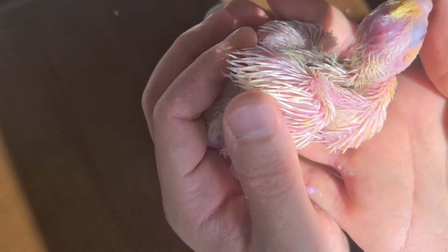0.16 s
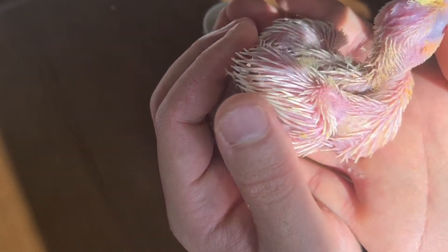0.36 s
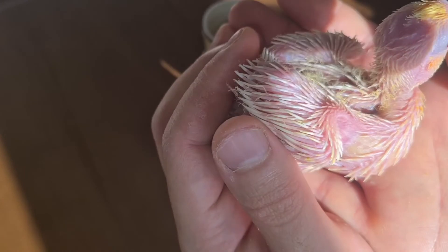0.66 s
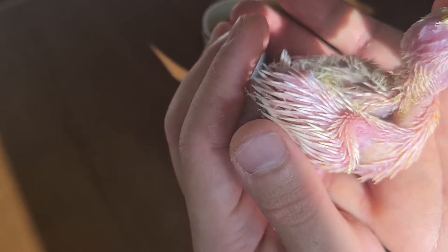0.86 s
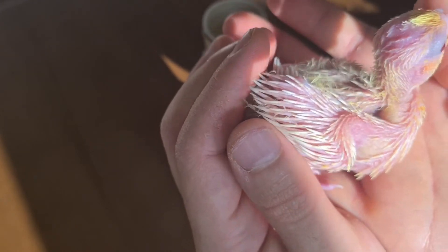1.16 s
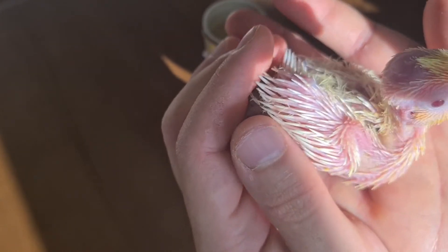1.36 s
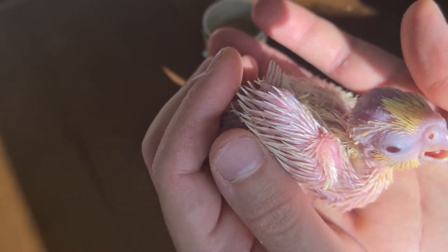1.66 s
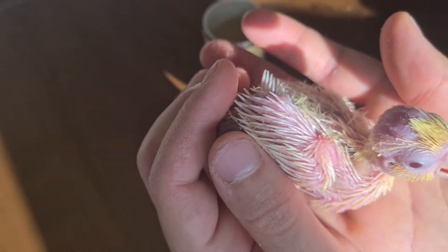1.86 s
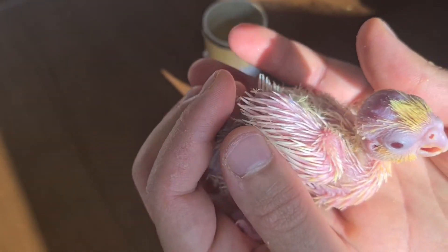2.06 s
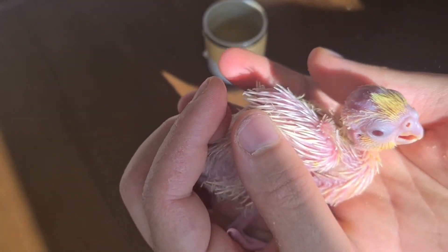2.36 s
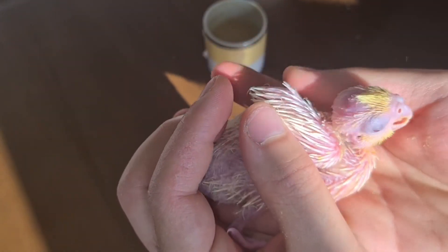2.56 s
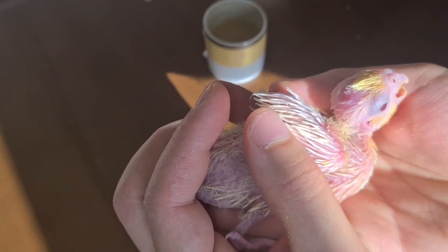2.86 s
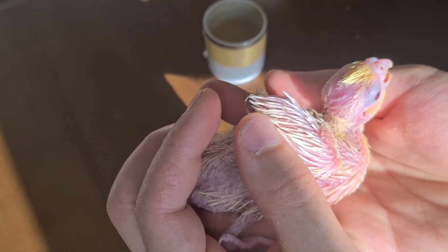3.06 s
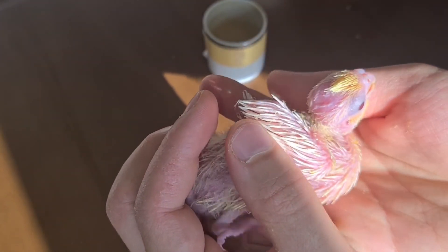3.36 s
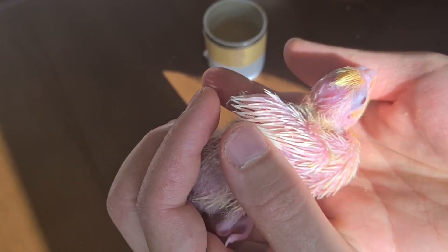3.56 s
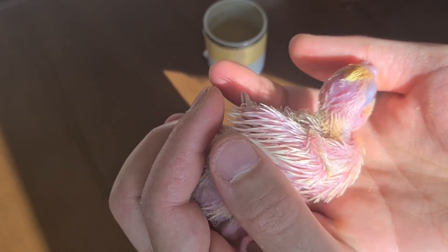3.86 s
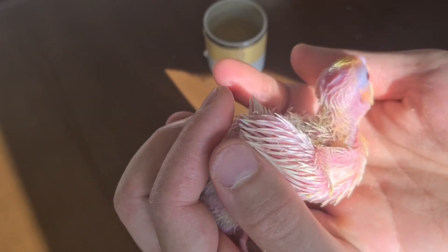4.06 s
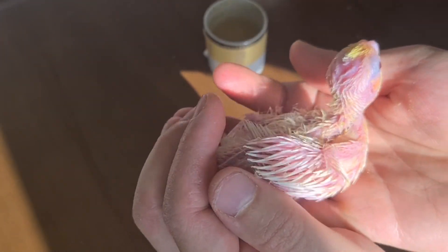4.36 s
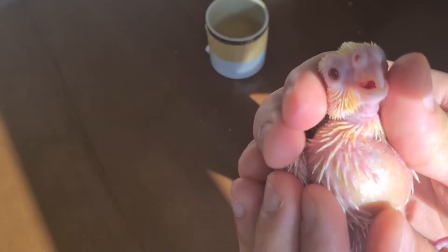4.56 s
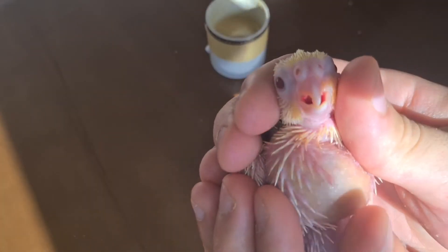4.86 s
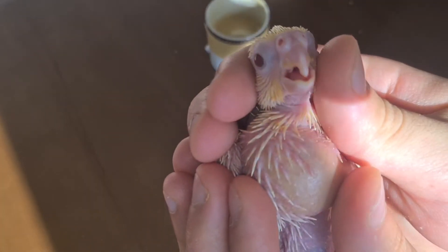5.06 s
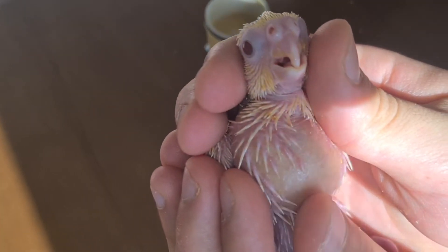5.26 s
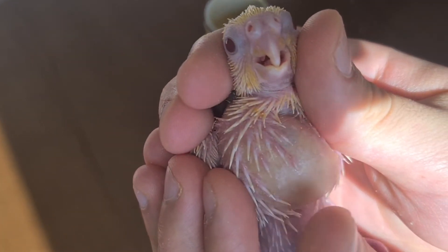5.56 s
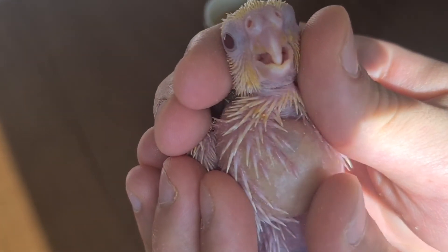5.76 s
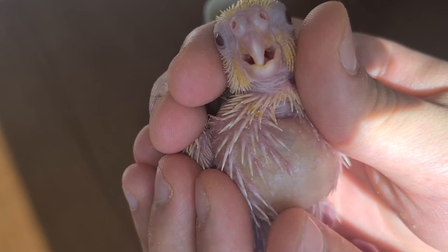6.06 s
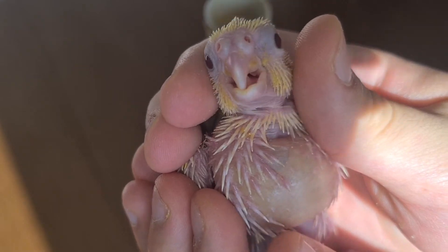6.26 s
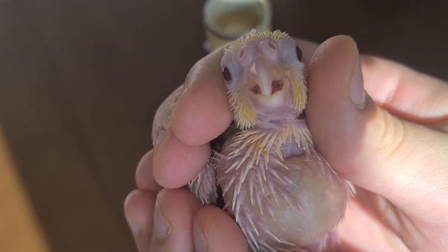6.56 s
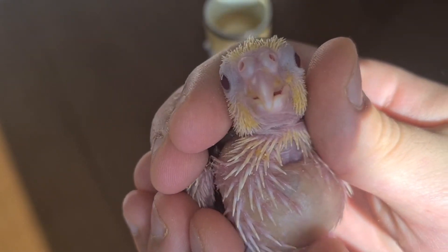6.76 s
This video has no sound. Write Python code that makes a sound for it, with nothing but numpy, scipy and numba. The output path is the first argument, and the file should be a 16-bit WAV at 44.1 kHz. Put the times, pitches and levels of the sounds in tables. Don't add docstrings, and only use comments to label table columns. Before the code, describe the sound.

A small parrot chick begs close by in a quiet room, giving nine harsh, rasping, hissy whistle-squeals with short gaps between them.

```python
import sys
import numpy as np
from scipy import signal
from scipy.fft import rfft, irfft, next_fast_len
from scipy.io import wavfile
from scipy.ndimage import uniform_filter1d, map_coordinates
from numba import njit

SR = 44100
rng = np.random.default_rng(int(sys.argv[2]) if len(sys.argv) > 2 else 0)


def to_linear_factor(level_db):
    exponent = np.asarray(level_db, float) / 20
    return 10 ** exponent


def dump_mix(stems):
    frames = np.atleast_2d(stems).T
    limited = np.clip(frames, -1, 1)
    pcm = np.round(limited * 32767).astype(np.int16)
    wavfile.write(sys.argv[1], SR, pcm)


N = 305172
PALATE_HZ = 6050

# start_s, left_right_db, palm_echo_ms, beak_to_mic_db
HEAD_TURNS = [(0, -2, .8, 5), (.8, -2, .75, 2), (1.25, -3.5, .8, -3), (1.9, -3, 1, 0.5),
              (2.4, -2.5, 0.77, 1), (2.8, -2, 0.8, -7.5), (3.3, 0.5, 0.664, 7), (3.8, -2, .75, 4.5),
              (4.2, -1.5, .8, 2), (4.66, -1.5, .8, 0), (4.88, 5.5, 0.76, -2), (5.3, 3, .65, -0.5),
              (5.8, 3, .6, 3.5), (6.2, 3, 0.53, -3), (6.9, 4.5, .6, 4)]


def rms_one(x):
    return x / np.sqrt(np.mean(x ** 2) + 1e-20)


def at_hz(points, hz):
    point_hz, value = np.array(points).T
    return np.interp(np.log(hz + 1), np.log(point_hz + 1), value)


def in_time(rows):
    s, *columns = np.transpose(rows)
    return [np.interp(np.arange(N) / SR, s, c) for c in columns]


def smooth(x, hz):
    r = np.exp(-2 * np.pi * hz / SR)
    return signal.lfilter([(1 - r) ** 2], [1, -2 * r, r * r], x)


def drift(hz):
    return rms_one(smooth(rng.standard_normal(N), hz))


def colour(x, gain):
    size = next_fast_len(N + 4096)
    hz = np.arange(size // 2 + 1) * SR / size
    return irfft(rfft(x, size) * gain(hz), size)[..., :N]


@njit
def resonate(x, hz, width):
    out = np.zeros(len(x))
    r = np.exp(-np.pi * width / SR) * np.ones(len(x))
    turn = 2 * np.cos(2 * np.pi * hz / SR) * r
    for i in range(2, len(x)):
        out[i] = (1 - r[i]) * (x[i] - x[i - 2]) + turn[i] * out[i - 1] - r[i] ** 2 * out[i - 2]
    return out


def ring(x, hz, width_hz):
    return resonate(x, np.full(len(x), float(hz)), float(width_hz))


def even(x):
    return x / np.sqrt(uniform_filter1d(x ** 2, size=2646) + 1e-12)


def calls():
    c = controls()
    b = breaks(c)
    drive_air = rng.standard_normal(N)
    drive = 0.4 * b["clicks"] + drive_air * b["puffs"]
    whistle, octave = voice_box(c, b)
    voice = to_linear_factor(-1.5) * whistle + to_linear_factor(c["hiss_db"] - 11.5) * octave
    voice = voice + to_linear_factor(c["rasp_db"] + 0.5) * throat(c, b)
    voice = voice + to_linear_factor(c["mouth_db"]) * mouth(c, drive)
    voice = voice + to_linear_factor(c["hiss_db"] + c["palate_db"]) * palate(drive)
    effort = smooth(c["on"], 440) * to_linear_factor(c["whistle_db"])
    return effort * (voice + beak_hiss(c, b, drive_air))


def controls():
    # start_s, whistle_db, whistle_hz, rasp_db (air spilling past the whistle)
    first_calls = [
        [(0, -40, 3738, 0), (.1, -37.5, 3929, 1), (.21, -34, 3790, -2), (.28, -40, 3659, 1),
         (.41, -37, 4020, -2), (.432, -38, 3916, -3), (.443, -44, 3780, 0)],
        [(.677, -56, 3050, 2), (.714, -61, 3090, 4), (.738, -44.5, 3500, 1), (.931, -37.5, 3813, 3),
         (1.047, -38.5, 3884, 2), (1.125, -37, 3945, -1), (1.225, -36.5, 4347, 3.5), (1.259, -27.5, 4320, -12),
         (1.268, -43.5, 4405, 6)],
        [(1.68, -34.5, 3590, -16), (1.704, -32, 3630, -14), (1.712, -37.5, 3657, -4), (1.85, -35.5, 3815, -1),
         (1.97, -37.5, 4206, 3), (2.194, -29.5, 4464, -3), (2.466, -30, 4676, -2.5), (2.486, -27, 4840, -4),
         (2.505, -37.5, 4930, 3)],
    ]
    middle_calls = [
        [(2.772, -28.5, 3955, -12), (2.79, -38, 4253, 0), (2.86, -37.5, 4494, -1), (2.92, -35, 4234, -2),
         (2.99, -33, 4553, -4), (3.011, -28, 4650, -18), (3.02, -32.5, 4705, -3), (3.24, -29.5, 4778, -6),
         (3.372, -26, 5302, -14)],
        [(3.695, -31, 3658, -11), (3.707, -38, 3640, 3), (3.749, -35, 3620, 3), (3.837, -33, 3563, -6),
         (3.907, -36, 3812, 3), (4.021, -34.5, 3937, -3), (4.19, -35.5, 4324, 0), (4.263, -33.5, 4286, -2),
         (4.272, -46, 4250, 8)],
        [(4.459, -57, 3097, 2), (4.475, -54, 3510, 6), (4.514, -45, 3708, 5), (4.554, -42, 3904, 5),
         (4.654, -37.5, 4277, 3), (4.669, -46, 4350, 8)],
    ]
    late_calls = [
        [(4.882, -37.5, 3164, -18), (4.96, -37.5, 3420, -10), (5.03, -40.5, 4192, -7),
         (5.098, -44.5, 4056, -21), (5.12, -42, 4210, -4), (5.2, -41, 3880, -2), (5.3, -37.5, 4400, 2),
         (5.394, -30, 5100, -11), (5.42, -32.5, 5155, -10)],
        [(5.67, -43.5, 3046, -3), (5.715, -37.5, 3563, -3), (5.78, -38.5, 3753, -6), (5.974, -39, 3780, -7),
         (6.032, -41.5, 3798, -18), (6.096, -31, 4100, -4.5), (6.122, -31.5, 4526, -20),
         (6.165, -34.5, 4023, -18), (6.222, -27.5, 4856, -10)],
        [(6.555, -51, 3540, 0), (6.561, -43, 3590, -7), (6.579, -38, 3697, -4.5), (6.695, -40.5, 3680, -12),
         (6.765, -46.5, 3653, -5), (6.795, -37.5, 3710, -21), (6.845, -38.5, 3790, -10.5),
         (6.92, -38, 3940, -12)],
    ]
    # throat_hz, throat_width_hz, breathiness (0-1)
    throats = [(1786, 320, .52), (1720, 316, .5), (1620, 306, .6), (1625, 412, .62), (1876, 790, .6),
               (1620, 490, .7), (1910, 997, .33), (1808.5, 900, .31), (1750, 855, .28)]
    # mouth_db, lowest_ring_db, gape_db, palate_db, hiss_db
    beaks = [(-4, -1, 0, -5, -7), (-6.5, 2, -5, -11.5, -11.5), (-8.5, 6.5, 3.5, -8.5, -9.5),
             (-5, -1.5, 2.5, -4, -7.5), (-2, -4, -15.5, -22, -7.5), (-5, -2.5, -13, -19, -10.5),
             (-3, 5.5, -11.5, -16, -10.5), (-0.5, 7, -8.5, -12, -12.5), (0.5, 6.5, -28, -1.5, -13)]
    clear_s = 0.07
    clear_breaks_per_s, breathy_breaks_per_s = 120, 520
    hiss_late_db, hiss_rise_s = -11.5, 0.04
    hiss_last_db, hiss_last_s = 7, 0.02

    curves = first_calls + middle_calls + late_calls
    whistle_db, whistle_hz, rasp_db = in_time(np.concatenate(curves))
    t = np.arange(N) / SR
    starts = np.array([curve[0][0] for curve in curves])
    ends = np.array([curve[-1][0] for curve in curves])
    call = np.maximum(np.searchsorted(starts, t, "right") - 1, 0)
    throat_hz, throat_width_hz, breathy = np.transpose(throats)[:, call]
    mouth_db, boom_db, gape_db, palate_db, hiss_db = np.transpose(beaks)[:, call]
    climb_hz = whistle_hz - 4000
    climb_khz = climb_hz / 1000

    warmed = np.where(call > 0, 1 - np.exp((starts[call] - t) / clear_s), 1)
    share = np.clip(warmed * (breathy + 0.14 * climb_khz + 0.013 * rasp_db), 0, 0.95)
    onset_db = (call > 0) * hiss_late_db * np.exp((starts[call] - t) / hiss_rise_s)
    spurt_db = (call < call.max()) * hiss_last_db * np.exp(-abs(ends[call] - t) / hiss_last_s)
    return dict(
        on=t < ends[call],
        whistle_db=whistle_db, whistle_hz=whistle_hz, rasp_db=rasp_db,
        throat_hz=throat_hz + 0.23 * climb_hz,
        throat_width_hz=throat_width_hz,
        share=share,
        breaks_per_s=clear_breaks_per_s + share * (breathy_breaks_per_s - clear_breaks_per_s),
        mouth_db=mouth_db + 1.1 * rasp_db,
        boom_db=boom_db - 6.5 * climb_khz,
        palate_db=palate_db + 7 * climb_khz,
        spread=1 + np.maximum(climb_khz - 0.45, 0),
        gape_db=gape_db + 2.5 * climb_khz + 0.4 * rasp_db,
        hiss_db=hiss_db + 0.74 * rasp_db + onset_db + spurt_db)


def breaks(c):
    turn = np.cumsum(c["breaks_per_s"] * to_linear_factor(5.5 * drift(90)) / SR)
    count, grown = turn.astype(int), turn % 1
    size, detune, restart = rng.standard_normal((6000, 3))[count % 6000].T
    swell = smooth(to_linear_factor(2 * size) * (0.15 + np.tanh(1.2 * grown)) * (grown < 0.9), 900)
    burst = smooth(to_linear_factor(2.5 * size) * 1.3 * np.exp(-6 * grown), 2000)
    puffs = (0.9 * c["share"] + 0.25 * swell + burst) * to_linear_factor(drift(30))
    clicks = rms_one(np.diff(count, prepend=0) * to_linear_factor(size))
    return dict(grown=grown, detune=detune, restart=restart, swell=swell, puffs=puffs, clicks=clicks)


def voice_box(c, b):
    whistle_hz, share, spread = c["whistle_hz"], c["share"], c["spread"]
    unsteady = 0.3 + share
    wander = 0.03 * smooth(b["detune"], 500) + 0.012 * drift(200)
    sag = 0.025 * smooth(b["grown"] ** 6, 700)
    pitch_hz = whistle_hz * (1 + unsteady * wander - sag)
    phase = 2 * np.pi * np.cumsum(pitch_hz) / SR + 1.1 * smooth(b["restart"], 800)
    breath = resonate(rng.standard_normal(N) * b["puffs"], whistle_hz, 420 * spread)
    breath = even(resonate(breath, whistle_hz, 1000 * spread))
    tone = even(b["swell"] * np.sin(phase))
    whistle = np.sqrt(1 - share) * tone + np.sqrt(share) * breath
    whistle = even(resonate(whistle, whistle_hz, 1200 * spread))
    octave = even(b["swell"] ** 2 * np.sin(2 * phase))
    return whistle, octave


def throat(c, b):
    drive = 0.62 * b["clicks"] + rng.standard_normal(N) * b["puffs"]
    rung = resonate(drive, c["throat_hz"], c["throat_width_hz"])
    return even(resonate(rung, c["throat_hz"], 3.13 * c["throat_width_hz"]))


def mouth(c, drive):
    # centre_hz, width_hz, level_db
    mouth_rings = [(872, 520, -9), (1310, 540, -2.5), (2700, 1080, 3.5), (3300, 1180, 7)]
    rings = [to_linear_factor(db) * rms_one(ring(drive, hz, width_hz)) for hz, width_hz, db in mouth_rings]
    rings[-1] = rings[-1] * (c["throat_width_hz"] / 600) ** 1.4
    rings[0] = rings[0] * to_linear_factor(c["boom_db"])
    low_pass = signal.butter(3, 4500, fs=SR, output="sos")
    low = signal.sosfilt(low_pass, even(sum(rings[::2]) - sum(rings[1::2])))
    return low + gape(c, drive)


def gape(c, drive):
    gape_hz = 4650
    rung = ring(ring(drive, gape_hz, 510), gape_hz, 1200)
    return to_linear_factor(c["gape_db"]) * rms_one(rung)


def palate(drive):
    return even(ring(ring(drive, PALATE_HZ, 800), PALATE_HZ, 1700))


def beak_hiss(c, b, drive_air):
    # freq_hz, db_per_hz
    hiss_spectrum = [(3500, -30.5), (5200, -36), (6200, -3), (7400, 4.5), (9000, -6), (10500, -10),
                     (11800, -7.5), (13000, -20), (15300, -15.5), (16000, -17)]
    side_air = rng.standard_normal((2, N))
    raw = 0.15 * b["clicks"] + (0.27 * drive_air + 0.5 * side_air) * b["puffs"]
    hiss = colour(raw, lambda hz: to_linear_factor(at_hz(hiss_spectrum, hz)))
    return to_linear_factor(c["hiss_db"]) * np.array([even(side) for side in cupped(hiss)])


def cupped(hiss):
    _, echo_ms, facing_db = in_time(HEAD_TURNS)
    high = signal.sosfilt(signal.butter(4, 10500, "high", fs=SR, output="sos"), hiss)
    hiss = hiss + (to_linear_factor(facing_db) - 1) * high
    late = [np.arange(N) - echo_ms * stretch * SR / 1000 for stretch in (1, 1.13)]
    echo = [map_coordinates(side, [at], order=2) for side, at in zip(hiss, late)]
    return hiss + 0.35 * np.array(echo)


def chirps():
    # start_s, length_s, start_hz, end_hz, peak_db
    chirp_events = [(.441, .012, 2394, 1720, -25.5), (0.65, .012, 2880, 3230, -50.5),
                    (.662, .01, 3250, 3200, -52), (0.672, .007, 3300, 2650, -43),
                    (1.264, .016, 3040, 2065, -25.5), (1.66, .024, 3050, 3520, -33.5),
                    (2.495, 0.0096, 2860, 2564, -23.5), (2.506, 0.0083, 2330, 2080, -18.5),
                    (2.733, .0079, 2900, 3300, -35), (2.742, .013, 3183, 4210, -34),
                    (2.755, 0.021, 4497, 3733, -29.5), (3.369, .012, 3485, 2247, -19),
                    (3.67, 0.0079, 1688, 2197, -40.5), (3.679, .016, 3105, 3300, -31),
                    (4.266, .014, 3300, 1952, -25.5), (4.451, 0.0056, 2700, 2910, -37),
                    (5.42, .013, 4224, 2660, -24.5), (5.422, 0.0098, 2965, 2200, -22),
                    (5.661, .011, 1730, 2170, -37.5), (6.221, 0.0098, 3030, 2479, -21),
                    (6.224, .0098, 2367, 2034, -22), (6.534, .004, 1750, 2259, -45.5),
                    (6.54, .016, 2700, 3220, -38)]
    out = np.zeros(N)
    wobble = drift(370)
    for s, length_s, start_hz, end_hz, peak_db in chirp_events:
        overtones_db = -17 + 0.92 * (peak_db + 25.5)
        palate_lift_db = 13 * (end_hz > start_hz)
        u = np.linspace(0, 1, round(length_s * SR))
        at = round(s * SR)
        glide_hz = end_hz + (start_hz - end_hz) * (1 - u) ** 1.8
        hz = glide_hz * (1 + 0.022 * wobble[at:at + len(u)])
        phase = 2 * np.pi * np.cumsum(hz) / SR

        def lift(overtone_hz):
            return to_linear_factor(palate_lift_db * np.exp(-((overtone_hz - PALATE_HZ - 300) / 500) ** 2))

        third_gain = to_linear_factor(1 - 12 * np.maximum(3 * hz / 1000 - 6.8, 0))
        second = lift(2 * hz) * np.cos(2 * phase)
        third = third_gain * lift(3 * hz) * np.sin(3 * phase)
        tone = np.sin(phase) + to_linear_factor(overtones_db) * u * (second - third)
        out[at:at + len(u)] += to_linear_factor(peak_db) * np.sin(np.pi * u ** 1.08) ** 0.43 * tone
    return out


def placed(x, lag_us, tail):
    # freq_hz, left_right_db
    port_tilt = [(0, 2), (5000, 3.5), (6500, 5), (7400, 9.5), (8300, -6.5), (9600, -4.5), (11500, -3.5),
                 (13500, 10.5), (16000, -7.5)]
    # delay_ms, level_db
    palm_echoes = [
        [(.31, -23.5), (.9, -24), (2.3, -29)],
        [(.22, -16), (1.2, -17), (3.1, -12.5)],
    ]
    pan_db = in_time(HEAD_TURNS)[0]
    ears = []
    for side, ear, echoes, decay in zip((1, -1), x, palm_echoes, tail):
        def path(hz):
            port = to_linear_factor(side * at_hz(port_tilt, hz) / 2)
            lag = np.exp(-1j * np.pi * hz * side * lag_us * 1e-6)
            bounced = sum(to_linear_factor(db) * np.exp(-2e-3j * np.pi * hz * ms) for ms, db in echoes)
            return port * lag * (1 + bounced)

        direct = to_linear_factor(side * pan_db / 2) * colour(ear, path)
        ears.append(direct + signal.fftconvolve(ear, decay)[:N])
    return np.array(ears)


def room_tail():
    t60_s, wall_cut_hz, gap_s, room_db = 0.37, 4800, 0.0047, -16.5
    t = np.arange(SR // 2) / SR
    noise = rng.standard_normal((2, len(t))) * np.clip((t - gap_s) / 0.0016, 0, 1)
    dull = smooth(noise, wall_cut_hz)
    tail = dull * to_linear_factor(-60 * t / t60_s) + (noise - dull) * to_linear_factor(-60 * t / (0.56 * t60_s))
    return to_linear_factor(room_db) * tail / np.sqrt(np.sum(tail ** 2, axis=1, keepdims=True))


def knocks():
    # start_s, peak_db, pitch_hz, t60_s
    touches = [
        (1.494, -54, 800.3, 0.031),
        (1.666, -45.5, 65.11, .35),
        (4.138, -47, 267, 0.16),
        (4.37, -53.5, 89.8, 0.26),
        (5.651, -57.5, 6042, 0.01003),
        (6.598, -50.5, 249.5, 0.13),
    ]
    out = np.zeros(N)
    t = np.arange(SR // 2) / SR
    for s, peak_db, hz, t60_s in touches:
        at = round(s * SR)
        noise = rms_one(ring(rng.standard_normal(len(t)), hz, 0.21 * hz))
        touch = to_linear_factor(peak_db - 60 * t / t60_s) * np.minimum(t * hz, 1) * noise
        out[at:at + len(t)] += touch[:N - at]
    return out


def room_air():
    # freq_hz, db_per_hz
    floor_spectrum = [(12, -17.5), (20, -2), (137, -11), (227, -7.5), (539, -13), (694, -17), (1050, -17.5),
                      (1320, -19.5), (1430, -24.5), (1690, -23), (1950, -29.5), (5180, -37.5),
                      (8320, -40.5), (12000, -39), (15800, -46)]
    # freq_hz, correlation
    likeness = [(60, 0.69), (180, 0.89), (550, 0.4), (1650, -0.23), (4970, -0.25), (15000, 0.05)]
    # centre_hz, width_hz, level_db
    hums = [(62.6, 6.1, -67.5), (129.4, 14, -67), (11000, 250, -95.5)]
    floor_db = -60

    def alike(hz):
        return np.clip(at_hz(likeness, hz), 0, 0.99)

    mid, side = rng.standard_normal((2, N))
    mid = colour(mid, lambda hz: to_linear_factor(at_hz(floor_spectrum, hz)) * np.sqrt(1 + alike(hz)))
    side = colour(side, lambda hz: to_linear_factor(at_hz(floor_spectrum, hz)) * np.sqrt(1 - alike(hz)))
    air = to_linear_factor(floor_db) * rms_one(mid + side * [[1], [-1]])
    for hz, width_hz, level_db in hums:
        air = air + to_linear_factor(level_db) * rms_one(ring(rng.standard_normal(N), hz, width_hz))
    return air


def scene():
    left_lag_us = (38, -175)
    change_s = 4.67
    t = np.arange(N) / SR
    chick = calls() + chirps()
    tail = room_tail()
    early = smooth(t < change_s, 450)
    before = placed(chick, left_lag_us[0], tail)
    after = placed(chick * (t > change_s), left_lag_us[1], tail)
    return early * before + after + knocks() + room_air()


def band_limit(x):
    return signal.sosfilt(signal.butter(12, 15970, fs=SR, output="sos"), x)


def record(dry):
    mix = colour(dry, lambda hz: hz < 15800)
    return band_limit(mix)


dry = scene()
out = record(dry)
dump_mix(out)
```